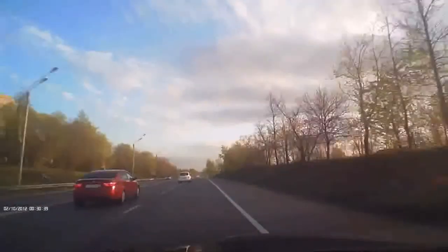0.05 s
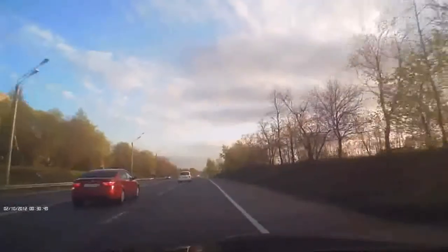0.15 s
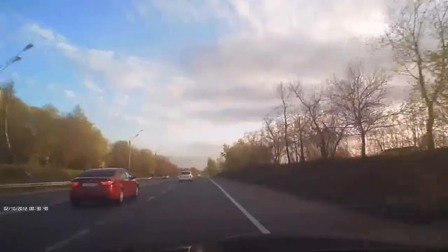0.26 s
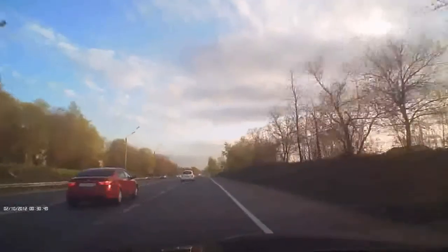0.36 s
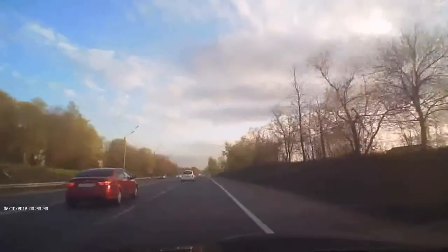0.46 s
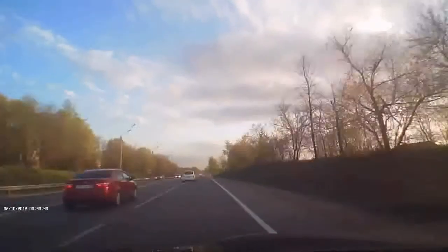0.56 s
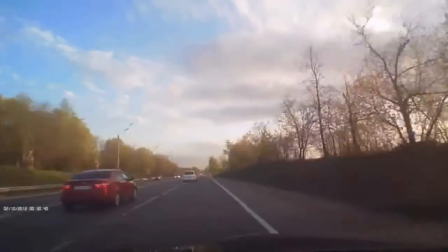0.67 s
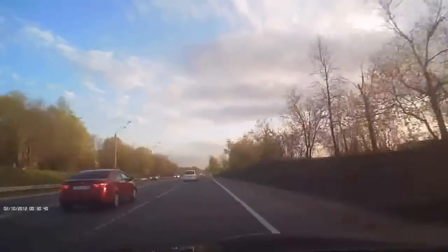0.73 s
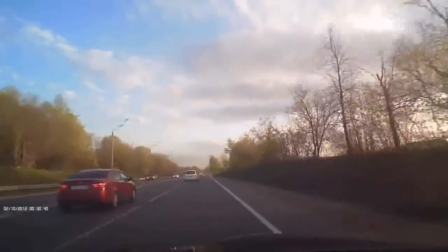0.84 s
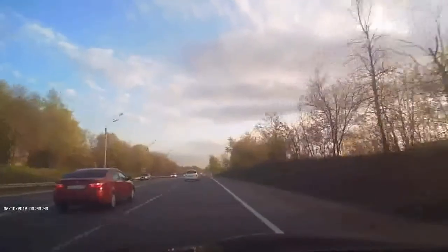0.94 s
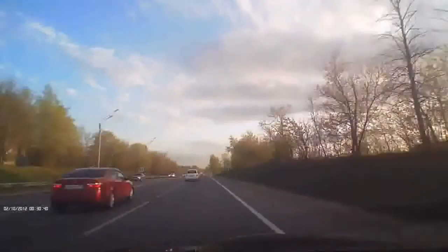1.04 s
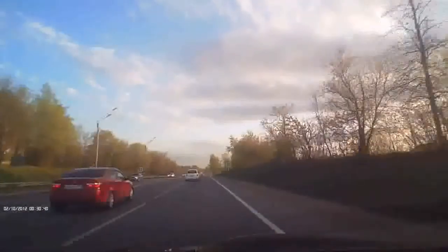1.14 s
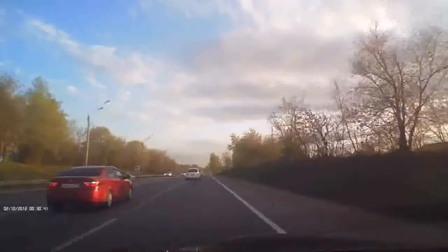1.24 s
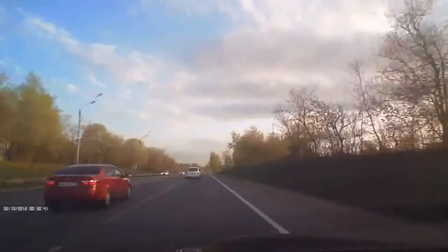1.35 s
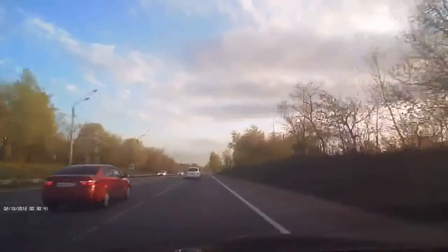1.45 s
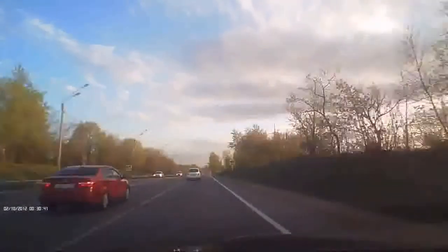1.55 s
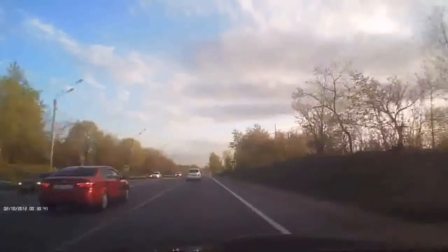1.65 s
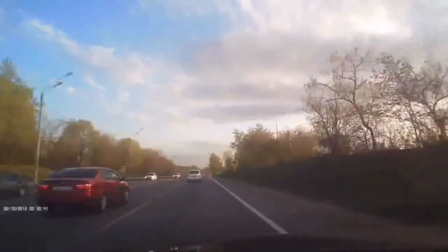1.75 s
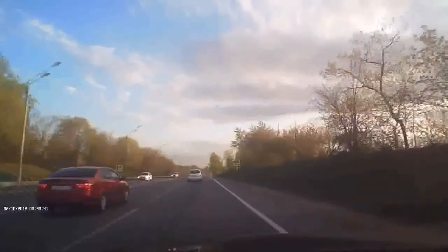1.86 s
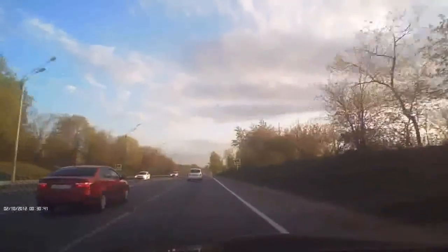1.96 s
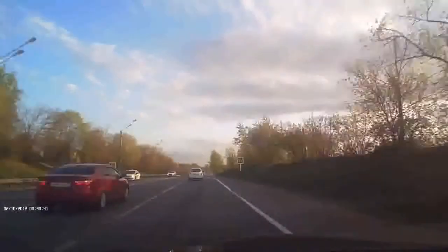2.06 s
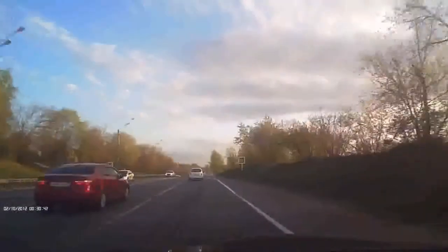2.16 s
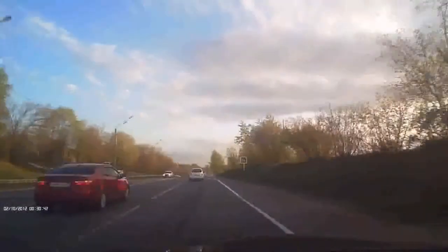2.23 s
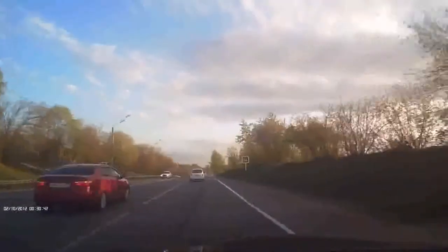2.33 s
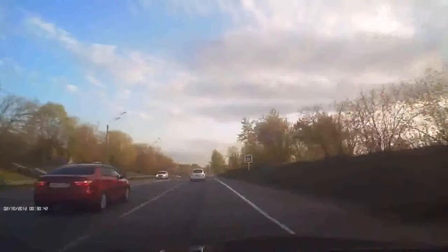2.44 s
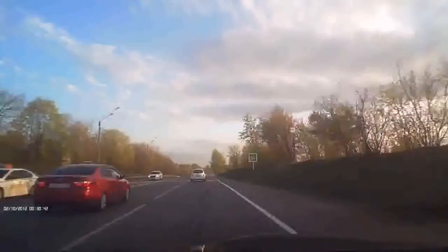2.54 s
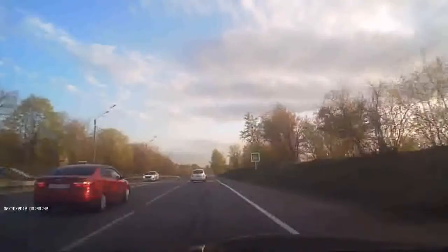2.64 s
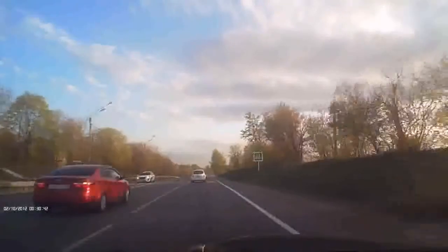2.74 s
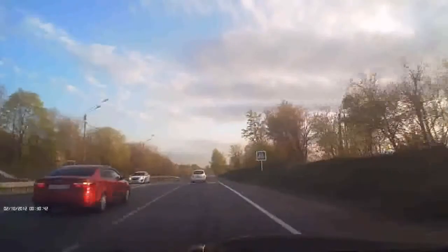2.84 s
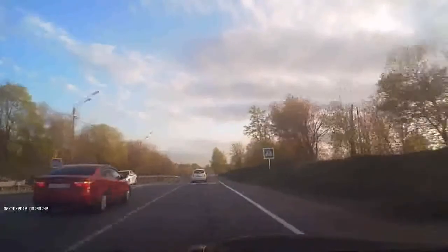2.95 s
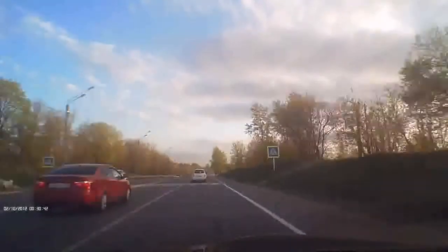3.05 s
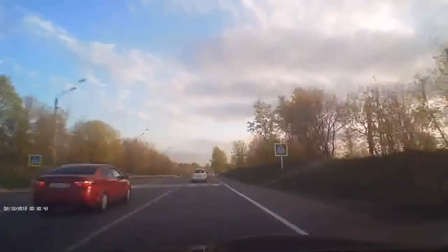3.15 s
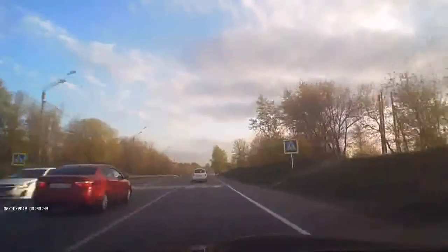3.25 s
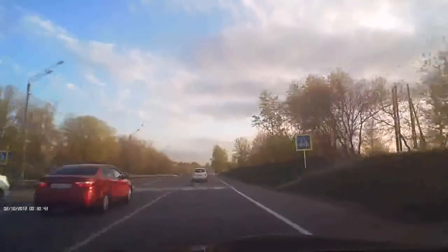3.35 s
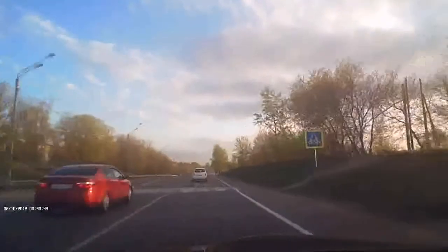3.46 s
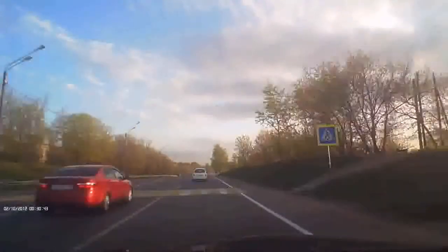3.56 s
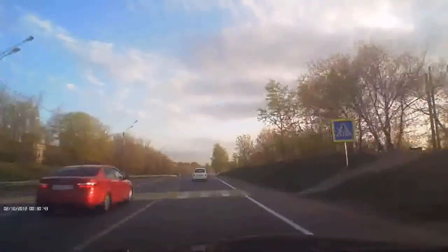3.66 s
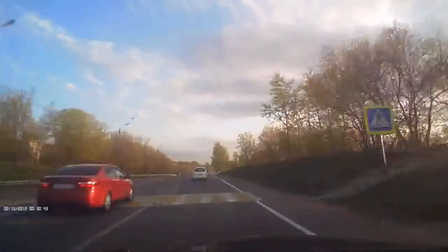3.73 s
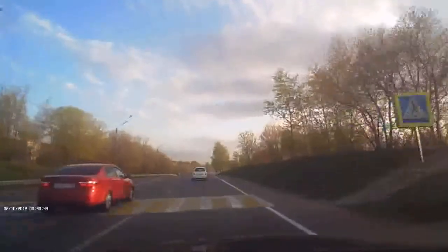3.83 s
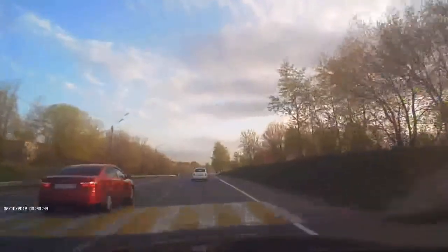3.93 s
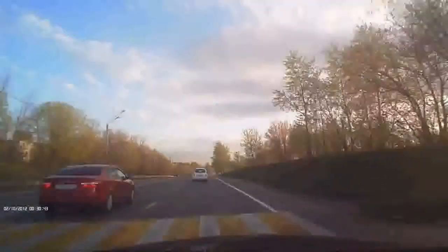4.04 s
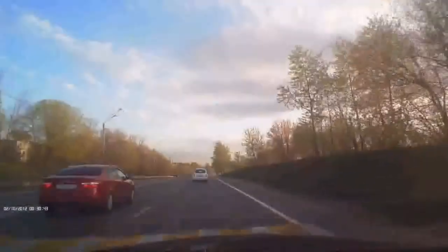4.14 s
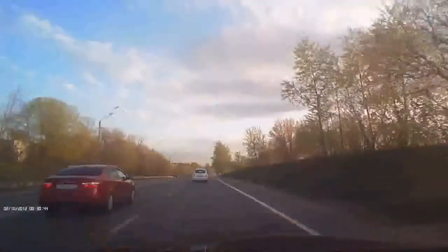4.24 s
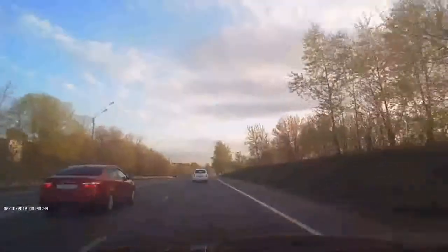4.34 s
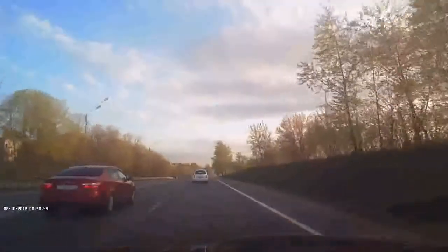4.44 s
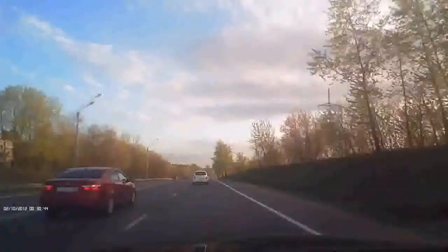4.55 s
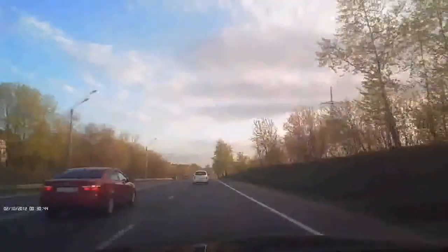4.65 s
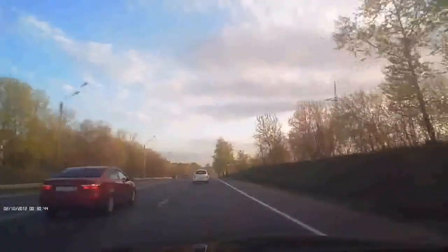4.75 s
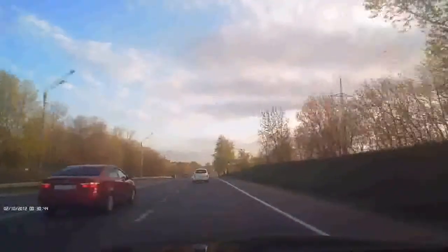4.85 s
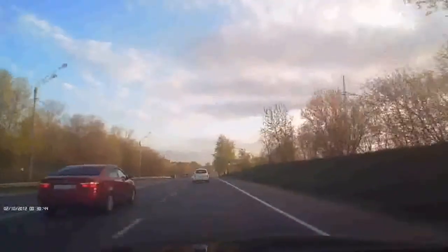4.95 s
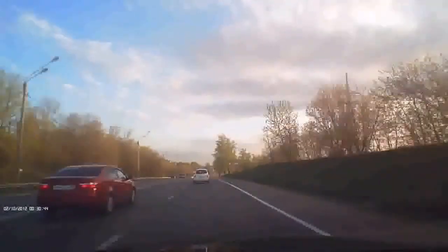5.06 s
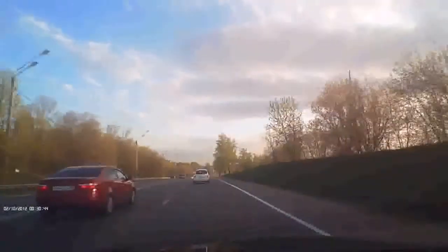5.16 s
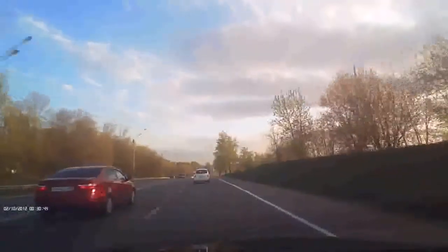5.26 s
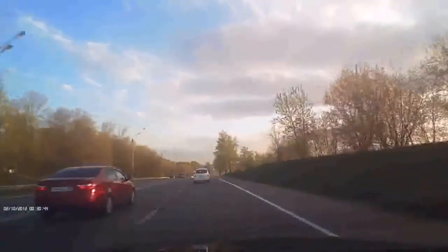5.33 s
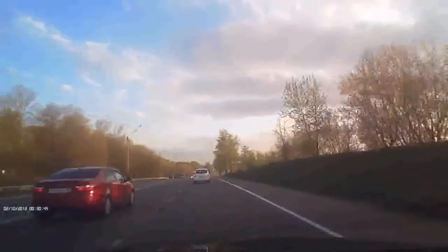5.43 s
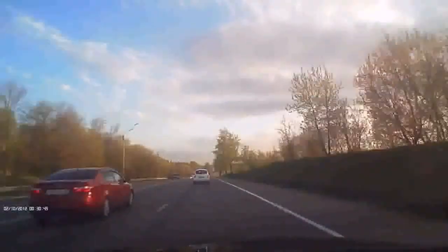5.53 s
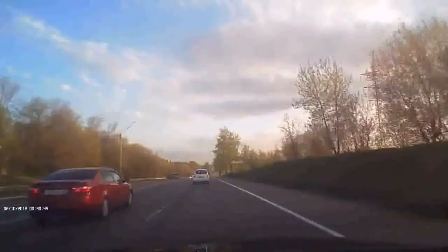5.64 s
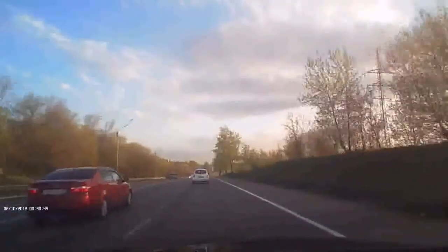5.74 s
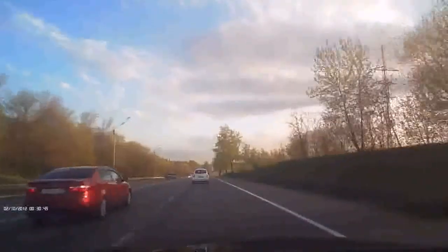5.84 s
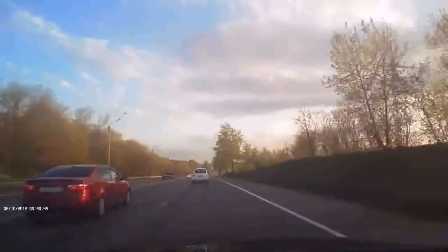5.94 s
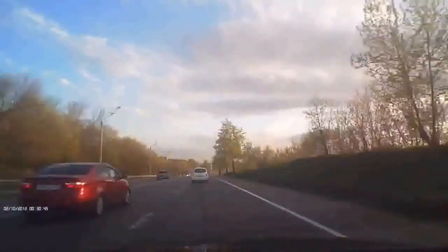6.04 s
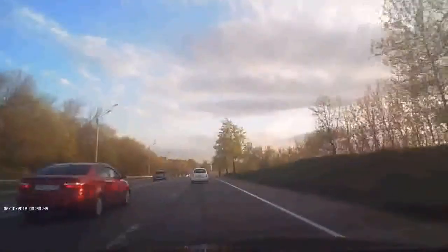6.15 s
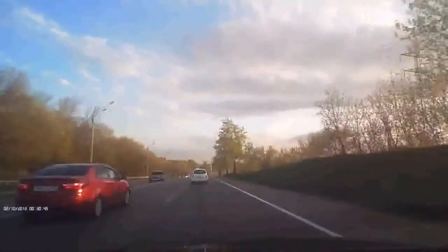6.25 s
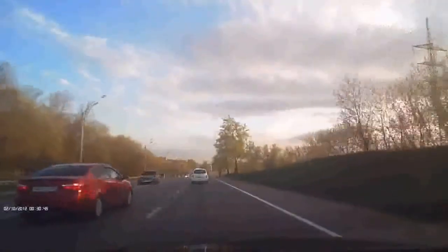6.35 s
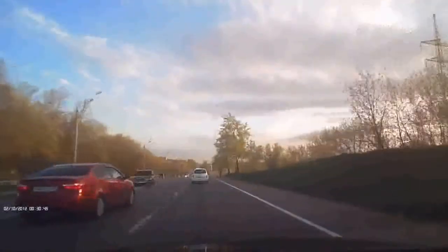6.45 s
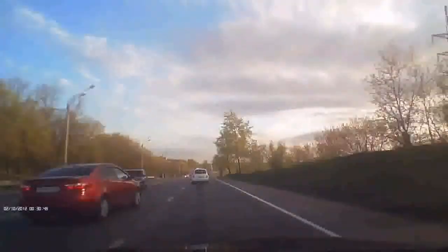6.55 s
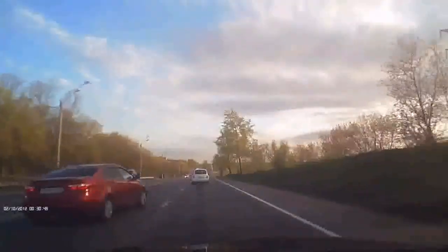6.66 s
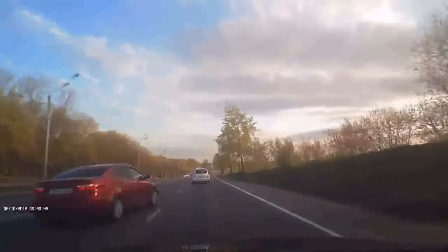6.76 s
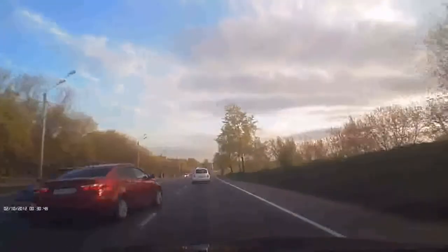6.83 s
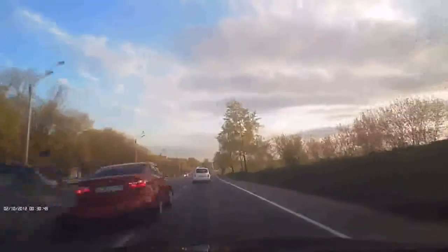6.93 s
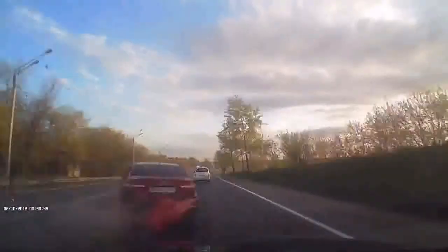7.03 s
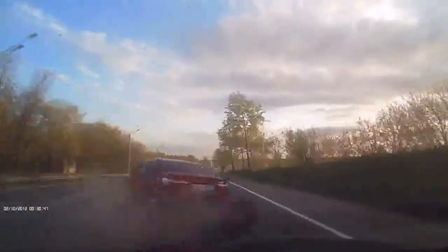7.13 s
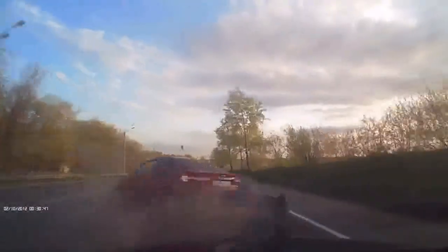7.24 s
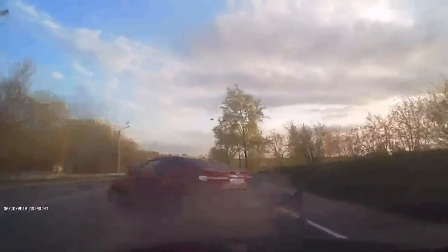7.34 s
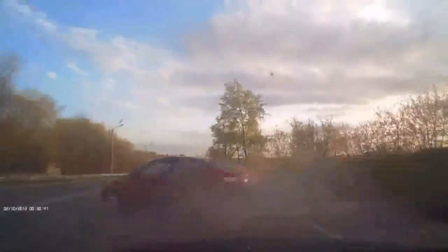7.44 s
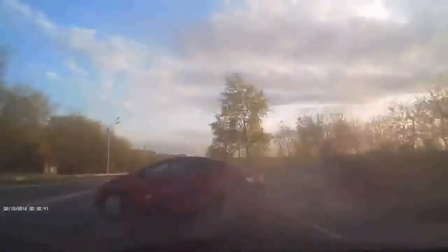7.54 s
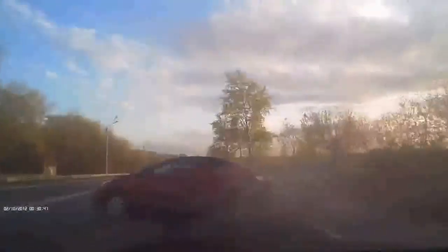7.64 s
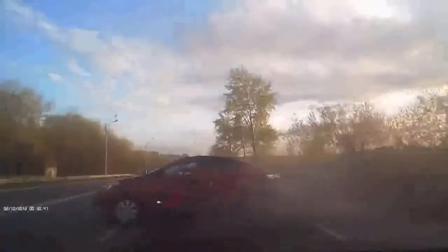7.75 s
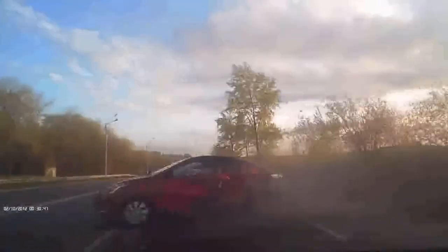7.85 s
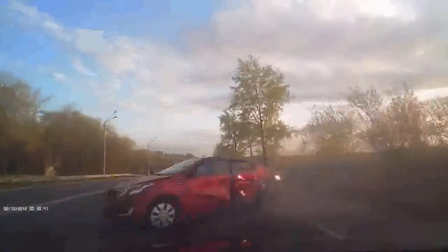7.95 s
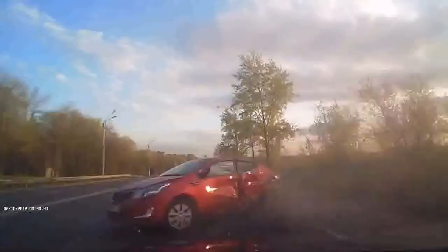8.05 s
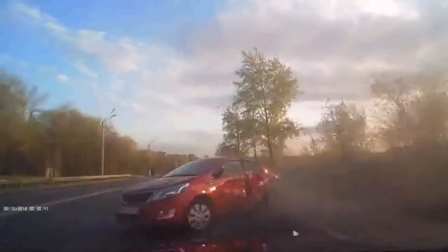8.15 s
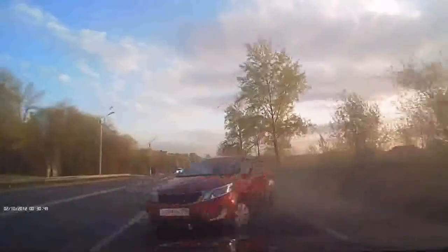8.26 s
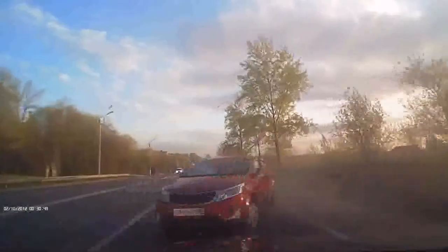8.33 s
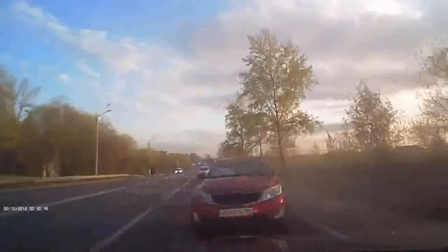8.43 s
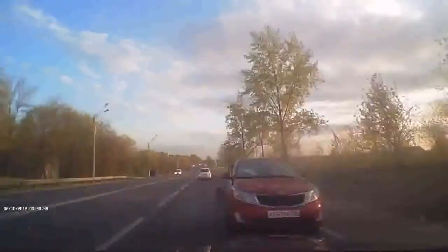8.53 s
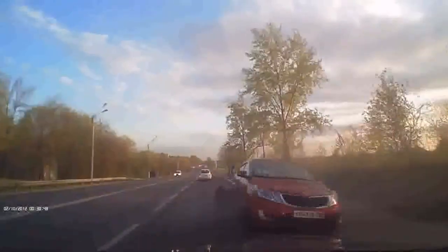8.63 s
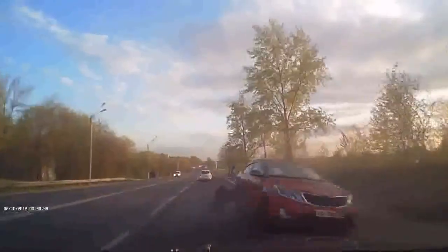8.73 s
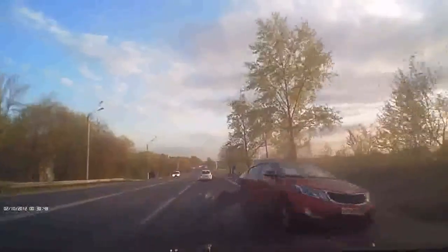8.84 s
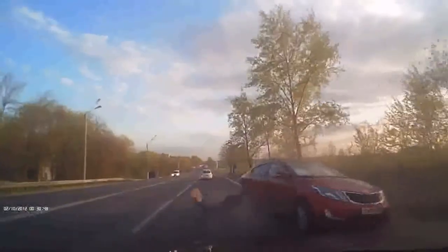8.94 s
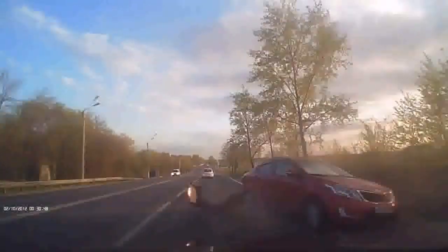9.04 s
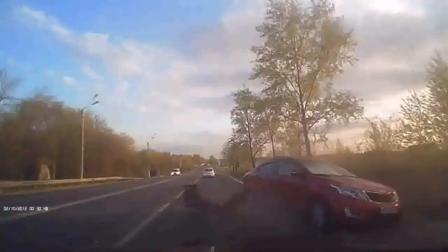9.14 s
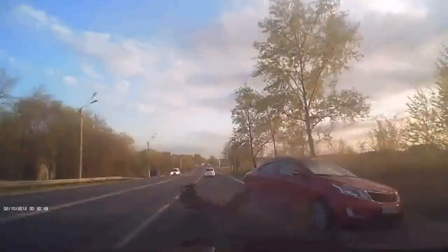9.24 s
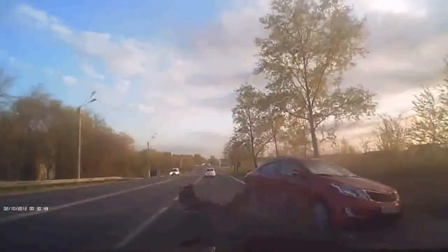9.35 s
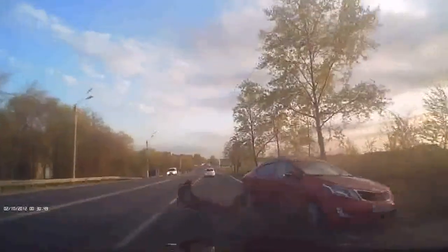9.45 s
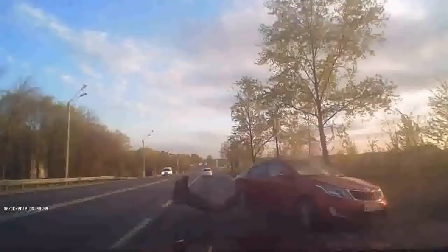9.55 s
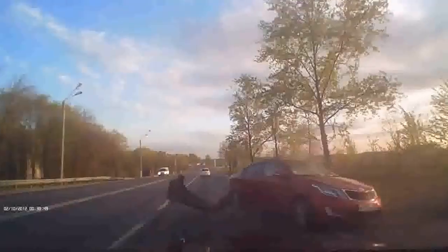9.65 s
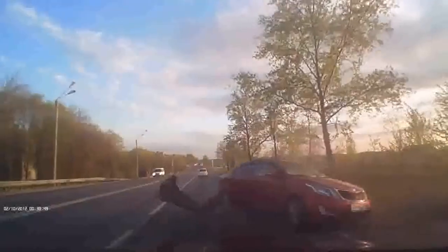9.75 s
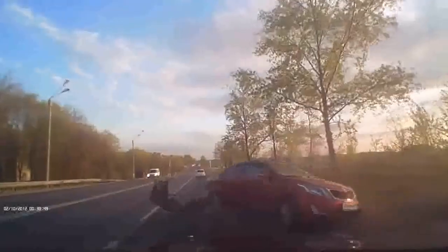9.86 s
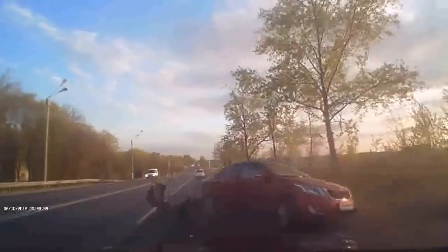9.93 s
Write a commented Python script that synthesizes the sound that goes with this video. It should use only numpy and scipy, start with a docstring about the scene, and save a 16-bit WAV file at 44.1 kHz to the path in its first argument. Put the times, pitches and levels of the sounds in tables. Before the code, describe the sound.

Muffled cabin sound of a car on a fast road: boomy, uneven rolling noise and one tiny dry tick. Then another car crashes close ahead: clustered metallic crunches distort the small microphone, torn metal shrieks, tyres squeal roughly around one tone, and debris ticks and thumps under the wheels. Low braking judder peaks, then everything thins into quieter road noise and faint chattering screeches.

```python
"""A car crash heard inside a following car through a small, overloaded, hissing microphone.
First filtered-noise tyre roar, booming and swelling on rough asphalt, and body heave; one tiny tick.
Near 7 s a string of blows: fracture bursts ring in sheet metal, torn metal shrieks, scraping grinds.
With them tyres squeal in wavering stick-slip tones, fragments tick, wreckage thumps, braking judders.
Last, roar and judder sink and thin screeches trail off."""
import sys
import numpy as np
from scipy import signal
from scipy.fft import rfft, irfft, next_fast_len
from scipy.io import wavfile
from scipy.ndimage import uniform_filter1d

SR = 44100
rng = np.random.default_rng(int(sys.argv[2]) if len(sys.argv) > 2 else 0)


def dump_mix(stems):
    """Bounce the given channels to the path in sys.argv[1] as a 16-bit WAV at rate SR."""
    frames = np.atleast_2d(stems).T  # one column per channel
    limited = np.clip(frames, -1, 1)  # hard clip at full scale
    pcm = np.round(limited * 32767).astype(np.int16)
    wavfile.write(sys.argv[1], SR, pcm)


N = 440559
TIME = np.arange(N) / SR


def amp(db):
    """Decibels to gain."""
    return 10 ** (np.asarray(db) / 20)


def evened(x):
    """Scales to rms 1."""
    return x / np.sqrt(np.mean(x ** 2) + 1e-20)


def level(rows):
    """Gain over time from rows of (s, dB); -120 dB before the first row."""
    time_s, db = np.transpose(rows)
    return amp(np.interp(TIME, time_s, db, left=-120))


def swell(s, half_s):
    """Gaussian rise to 1 and back around time s; 1/e at half_s on either side."""
    return np.exp(-((TIME - s) / half_s) ** 2)


def decay(t, t60):
    """Exponential decay by 60 dB in t60 seconds."""
    return np.exp(-np.log(1000) * t / t60)


def add(mix, s, sound):
    """Mixes a sound in at time s."""
    part = mix[round(s * SR):][:len(sound)]
    part += sound[:len(part)]


def wander(rate_hz, size=N):
    """Smooth random curve of rms 1, moving up to about the given rate."""
    padded = next_fast_len(size)
    hz = np.fft.rfftfreq(padded, 1 / SR)
    spectrum = rfft(rng.standard_normal(padded)) * np.exp(-(hz / rate_hz) ** 2)
    return evened(irfft(spectrum, padded)[:size])


# Air and trim resonances of the cabin. Each row: centre in Hz, width in Hz, lift in dB.
CABIN_HZ_HZ_DB = [(113.2, 20, 4.5), (172.6, 12, 6.5), (213.8, 33, 4.5), (311.6, 36, 3.5), (409, 43, 6.5),
                  (612, 67, 3.5), (768, 87, 7.5), (904.6, 26, 8), (985, 96, 5.5), (1113, 63, 9),
                  (1212, 31, 8.5), (1450, 180, 6), (1440, 170, -0.5), (1591, 17, 9.5), (1870, 80, 6)]


def colour(x, spectrum, cabin=1., size=8192):
    """Minimum-phase filter: a smooth (Hz, dB) spectrum with a share of the cabin's resonances."""
    hz = np.fft.rfftfreq(size, 1 / SR)
    f, db = np.transpose(spectrum)
    lift_db = sum(height * np.exp(-2 * ((hz - centre) / width) ** 2)
                  for centre, width, height in CABIN_HZ_HZ_DB)
    standing_out_db = lift_db - uniform_filter1d(lift_db, size=70)
    gain_db = np.interp(np.log(hz + 1), np.log(f), db) + cabin * standing_out_db
    log_gain = np.log(amp(np.r_[gain_db, gain_db[-2:0:-1]]))
    response = np.fft.ifft(np.exp(np.conj(signal.hilbert(log_gain)))).real[:size // 2]
    fade_out = signal.windows.tukey(size, .5)[size // 2:]
    return signal.oaconvolve(x, response * fade_out)[:len(x)]


def resonate(x, hz, width_hz):
    """A resonance of gain 1 that follows the curve hz."""
    turn = np.exp(2j * np.pi * np.cumsum(hz * np.ones(len(x))) / SR)
    r = np.exp(-np.pi * width_hz / SR)
    return 2 * (turn * signal.lfilter([1 - r], [1, -r], x / turn)).real


def resonant_noise(hz, width_hz, size=N):
    """Noise through two equal resonances, rms 1."""
    once = resonate(rng.standard_normal(size), hz, width_hz)
    return evened(resonate(once, hz, width_hz))


def snaps(per_s, spread_db):
    """A random train of small and large fractures, rms 1."""
    size = amp(spread_db * np.minimum(rng.exponential(1, N), 4))
    return evened(size * rng.choice([-1, 1], N) * (rng.random(N) < per_s / SR))


# Tyre roar on asphalt. Each row: frequency in Hz, density in dB per Hz.
ROAR_HZ_DB = [(25, -12.5), (50, 1), (80, 1.5), (140, -2), (350, -3), (430, -5.5), (520, -4.5), (700, -7.5),
              (900, -3.5), (1120, -3.5), (1500, -9), (1800, -20), (2400, -26.5), (5000, -79)]
# Hiss of the tread. Each row: frequency in Hz, density in dB per Hz.
TREAD_HZ_DB = [(400, -39.5), (1200, -6), (1650, 1), (2000, -3.5), (2500, -17.5), (3150, -24.5), (4000, -31),
               (5000, -41.5), (7000, -58)]
# Rolling level, following the car's speed. Each row: time in seconds, reference level in dB.
ROLLING_S_DB = [(0.0, -29), (4.2, -29), (7.0, -30), (9.4, -32.5), (9.99, -34.5)]
# Coarse asphalt. Each row: centre in seconds, half length in seconds, lift of roar and hiss in dB,
# further lift of hiss in dB.
COARSE_PATCHES = [(0.803, 0.17, 2.1, 0.5), (2.49, 0.1, 3, 1.7), (3.246, .3, 1.5, 2.5), (3.927, .2, 1, 4.5)]
# Rough patches and debris under the wheels. Each row: centre in seconds, level in dB,
# resonance in Hz, half length in seconds.
BOOMS = [(.85, -35.5, 214, 0.094), (2.497, -29.5, 110.5, 0.027), (4.107, -34.5, 98, 0.44),
         (5.357, -28, 176, 0.11), (5.95, -30.5, 402.6, 0.17), (8.033, -26, 314, .05),
         (8.355, -23, 300, .022), (8.551, -25.5, 140, .04)]
ROAR_DB, TREAD_DB = 5.0, -12.5  # over the rolling level on smooth asphalt


def road():
    """Noise of tyre on asphalt swells with its grain; rough patches stir low cabin resonances."""
    patch_db = sum(db * swell(s, half) for s, half, db, _ in COARSE_PATCHES)
    hiss_db = sum(db * swell(s, half) for s, half, _, db in COARSE_PATCHES)
    roar = evened(colour(rng.standard_normal(N), ROAR_HZ_DB, cabin=0.95))
    roar *= amp(ROAR_DB + 0.73 * wander(22.0))
    tread = evened(colour(rng.standard_normal(N), TREAD_HZ_DB, cabin=0.63))
    tread *= amp(TREAD_DB + hiss_db + 0.73 * wander(14.))
    rolling = (roar + tread) * level(ROLLING_S_DB) * amp(patch_db + 0.41 * wander(4.))
    booms = sum(resonant_noise(hz, 36.) * amp(db) * swell(s, half) for s, db, hz, half in BOOMS)
    return rolling + booms


# Heave of the body on its springs. Each row: frequency in Hz, density in dB per Hz.
HEAVE_HZ_DB = [(4, -1), (12, -4), (18, 18), (28, -4.5), (40, -3), (55, -13), (100, -21), (500, -100)]
# Dips in the road. Each row: centre in seconds, lift of the heave in dB.
DIPS_S_DB = [(.04, 6.5), (.44, 6), (.97, 4), (2.22, 4.5), (3.42, 4.5), (4.23, 3.5), (4.58, 9.5), (4.9, 6),
             (6.88, 2.5), (7.23, 4), (7.85, 7), (8.72, 4), (9.6, 5)]
# Floor judder. Each row: frequency in Hz, density in dB per Hz.
JUDDER_HZ_DB = [(20, -13), (33, 8), (48, 0), (75, 3.5), (130, 0), (180, -5.5), (230, -7), (310, -2.5),
                (450, -16.5), (900, -53.5), (3000, -92.5)]
# Braking effort. Each row: time in seconds, judder in dB before JUDDER_TRIM_DB.
BRAKING_S_DB = [(7.2, -34.5), (7.75, -22.5), (7.96, -15), (8.35, -18.5), (8.7, -26), (9.4, -39),
                (9.99, -47)]
HEAVE_DB, DIP_HALF_S = 6.0, 0.07  # heave over the rolling level
JUDDER_TRIM_DB = -4.5
JOLT_S, JOLT_DB, JOLT_HALF_S = 7.09, -16.0, 0.039  # first impact shakes the floor


def body():
    """The sprung body heaves at dips, jolts at the impact and judders in braking, low-passed."""
    rocking_db = HEAVE_DB + sum(db * swell(s, DIP_HALF_S) for s, db in DIPS_S_DB)
    heave = evened(colour(rng.standard_normal(N), HEAVE_HZ_DB, cabin=0))
    heave *= level(ROLLING_S_DB) * amp(rocking_db)
    braking = level(BRAKING_S_DB) * amp(JUDDER_TRIM_DB)
    jolt = amp(JOLT_DB) * swell(JOLT_S, JOLT_HALF_S)
    judder = evened(colour(rng.standard_normal(N), JUDDER_HZ_DB, cabin=0.25))
    judder *= (braking + jolt) * amp(1.4 * wander(30.))
    return signal.sosfilt(signal.butter(2, 800, fs=SR, output="sos"), heave + judder)


TICK_S, TICK_DB = 2.5284, -24.5


def tick():
    """One tiny dry tick: a four-sample pulse."""
    out = np.zeros(N)
    add(out, TICK_S, amp(TICK_DB) * np.array([0.7, 0.62, -0.2, -.6]))
    return out


# Fragments striking car and road. Each row: start in seconds, level in dB, ring in Hz,
# ring width in Hz, t60 in seconds.
FRAGMENTS = [(7.221, -16.5, 4560, 131, 0.034), (7.432, -31, 4000, 5000, 0.026),
             (7.568, -31, 4000, 5500, 0.012), (7.582, -41, 4500, 4500, 0.023),
             (7.63, -42, 4500, 4500, 0.017), (7.743, -32, 3970, 5500, 0.011),
             (7.922, -40, 5430, 4500, 0.056), (7.997, -42, 3960, 4500, 0.011),
             (8.161, -40.5, 5340, 2820, 0.013), (8.438, -42, 5900, 250, 0.035),
             (8.475, -41, 3010, 3000, 0.12), (8.86, -56.5, 7000, 1800, 0.058),
             (9.224, -48, 3550, 2500, 0.087)]
# Wreckage under the wheels. Each row: start in seconds, peak in dB, t60 in seconds.
THUMPS = [(7.586, -9, 0.047), (7.945, -9.5, 0.16), (8.62, -14.5, 0.072), (8.837, -11, 0.075)]


def wreckage():
    """Glass and plastic tick and ring as decaying tones; larger pieces thump as decaying noise."""
    out, t = np.zeros(N), np.arange(SR // 4) / SR
    for s, db, hz, width, t60 in FRAGMENTS:
        pitch_hz = hz + width / 2 * wander(width, len(t))  # narrow: a ping; wide: a tick
        ring = np.sin(2 * np.pi * np.cumsum(pitch_hz) / SR)
        attack = 1 - np.exp(-t * width * 2)
        add(out, s, ring * amp(db) * decay(t, t60) * attack)
    floor_hz_db = [(50, -1.5), (170, 3.0), (350, -6.5), (750, -2),
                   (1500, -19), (5000, -52.0), (10000, -74.5)]
    for s, db, t60 in THUMPS:
        push = rng.standard_normal(len(t)) * decay(t, t60)
        knock = colour(push, floor_hz_db, cabin=.3)
        add(out, s, amp(db) * knock / abs(knock).max())
    return out


def squeal(rows, jitter, width_hz, throb_db, throb_hz, bend=0.031):
    """Tread or torn metal sticks and slips at a wavering pitch; roughness turns tone to chatter."""
    s, *columns = np.transpose(rows)
    t = np.arange(s[0], s[-1], 1 / SR)
    hz, db, octave_db, rough = (np.interp(t, s, c) for c in columns)
    rough, size = np.clip(rough, 0, 1), len(t)
    # uneven hops of the contact swell the sound and bend its pitch
    hop_hz = throb_hz * (1 + .4 * wander(35.16, size))
    hop = np.sqrt(rough) * np.sin(2 * np.pi * np.cumsum(hop_hz) / SR)
    pitch_hz = hz * (1 + jitter * wander(115.5, size) + bend * hop)
    phase = 2 * np.pi * np.cumsum(pitch_hz) / SR
    tone = np.zeros(size)
    for k, gain in ((1, 1), (2, amp(octave_db))):
        chatter = resonant_noise(k * hz, width_hz * np.sqrt(k), size)
        pure = np.sqrt(2 * (1 - rough)) * np.cos(k * phase)
        tone += gain * (pure + np.sqrt(rough) * chatter)
    throbbing = evened(tone * amp(throb_db * hop))
    out = np.zeros(N)
    add(out, s[0], amp(db) * throbbing * signal.windows.tukey(size, .02))
    return out


SQUEAL_ATTACK_S, SQUEAL_RELEASE_S = 0.015, .025  # each at most half the slip
SQUEAL_SAG_DB, EDGE_DROP_DB = 1.5, 15


def slip(start, length, db, first_hz, last_hz, octave_db, rough):
    """One slip catches, sags gliding and lets go: rows of s, Hz, dB, octave dB, roughness."""
    attack_end = min(SQUEAL_ATTACK_S, length / 2)
    release_start = max(length - SQUEAL_RELEASE_S, length / 2)
    t = np.array([0, attack_end, release_start, length])
    drop_db = [EDGE_DROP_DB, 0, SQUEAL_SAG_DB, SQUEAL_SAG_DB + EDGE_DROP_DB]
    return [(start + s, first_hz + (last_hz - first_hz) * s / length, db - d, octave_db, rough)
            for s, d in zip(t, drop_db)]


# Tyre squeals. Each row: start in seconds, length in seconds, level in dB, first pitch in Hz,
# last pitch in Hz, octave in dB relative, roughness from 0 to 1.
SQUEALS = [(7.19, 0.32, -19, 927, 943, -12, 0.77), (7.3, .62, -25.5, 1147, 1135, -19, .75),
           (7.482, 0.058, -11.5, 976, 1007, -10.5, 0), (7.532, .07, -11.5, 1012, 1036, -14, .3),
           (7.615, 0.086, -10, 992, 978, -14.5, 0.11), (7.688, 0.076, -14.5, 975, 960, -5.5, 0.4),
           (7.738, 0.061, -12.5, 960, 946, -13, 0.5), (7.79, 0.21, -22.5, 915, 917, -16, .5),
           (7.961, 0.67, -23.5, 1097, 1077, -19.5, 0.51), (7.976, .23, -11.5, 948.7, 911, -16.5, .1),
           (8.19, .385, -18.5, 900, 933, -13, 0.4), (8.485, 0.078, -17.5, 1000, 1115, -16, .35),
           (8.56, .11, -24, 1160, 1290, -27, 0.37), (8.774, .06, -26.5, 1303, 1310, -21, 0.55),
           (9.02, .31, -30, 1053, 1064, -11, 0.74), (9.131, .15, -26, 1254, 1223, -27, 0.3),
           (9.35, 0.076, -26.5, 1165, 1163, -20, 0.55), (9.339, .32, -29, 1008, 1000, -9, 0.72),
           (9.64, .29, -30, 1048, 1058, -12, 0.7)]
# Tyre hop, slowing as the cars lose speed. Each row: time in seconds, mean hops per second.
HOPPING_S_HZ = [(8.4, 46), (9.3, 15)]


def tyres():
    """Sliding tyres bite and let go in stick-slip, each time on their own pitch."""
    out = np.zeros(N)
    for row in SQUEALS:
        hop_hz = np.interp(row[0], *np.transpose(HOPPING_S_HZ))
        out += squeal(slip(*row), jitter=0.0282, width_hz=140,
                      throb_db=5.0, throb_hz=hop_hz, bend=0.034)
    return out


def panels(x, share, t60, count=220):
    """Bent sheet metal rings in many close decaying modes."""
    t = np.arange(SR // 4) / SR
    hz = np.geomspace(1300, 9000, count) * rng.uniform(0.89, 1.01, count)
    phase = rng.uniform(0, 2 * np.pi, count)
    waves = np.sin(2 * np.pi * hz[:, None] * t + phase[:, None])
    modes = np.sqrt(hz) @ waves * decay(t, t60)
    return x + share * signal.oaconvolve(x, modes / np.linalg.norm(modes))[:N]


# The wreck drags on the road. Each row: time of full contact in seconds, level in dB,
# hold in seconds, fade in dB per second.
SCRAPES = [(7.207, -18.5, 0.27, 15), (7.919, -21.5, 0.086, 18), (8.48, -25.5, .005, 120),
           (8.8, -33.5, .01, 60), (9.357, -35, 0.027, 14)]
SCRAPE_RISE_S = 0.03


def dragging():
    """Pressure of the wreck on the road: each contact digs in, holds and fades."""
    contacts = []
    for s, db, hold, fade in SCRAPES:
        fading = amp(db - fade * np.maximum(TIME - s - hold, 0))
        contacts.append(fading * np.where(TIME < s, swell(s, SCRAPE_RISE_S), 1))
    return np.max(contacts, axis=0)


# Crumpling bodywork. Each row: frequency in Hz, density in dB per Hz.
CRUMPLE_HZ_DB = [(59, -58), (100, -0.5), (224, -7.5), (286, -2.5), (329, -11.5), (420, -5), (568, -4),
                 (886, -0.5), (1200, -1), (1910, -11), (2070, -10.5), (4460, -31.5), (12500, -55.5),
                 (16200, -88), (22000, -120)]
# Blows. Each row: peak time in seconds, level in dB, rise in seconds, fall in seconds.
BLOWS = [(7.023, -25, .01, 0.063), (7.059, -19, .002, 0.017), (7.073, -5, 0.024, 0.048),
         (7.102, -7.5, 0.016, 0.044), (7.148, -19, .005, .02), (7.228, -16.5, 0.033, 0.033),
         (7.28, -9.5, 0.024, 0.052), (7.318, -7, 0.013, 0.028), (7.378, -13.5, .012, 0.041),
         (7.435, -18, .005, 0.058), (7.583, -11, 0.0073, 0.013), (7.923, -20, 0.006, 0.028)]
# Scraping, dulled by closed windows. Each row: frequency in Hz, density in dB per Hz.
GRIND_HZ_DB = [(60, -16), (200, -7), (450, -5.5), (650, -2), (1000, 4.5), (1450, 3), (2000, -5),
               (2700, -14.5), (4000, -27.5), (6000, -46.5), (8000, -49), (12500, -72)]
# Shrieks of tearing metal. Each row: start in seconds, level in dB, pitch in Hz.
SHRIEKS = [(7.125, -20, 1478), (7.205, -21, 1900), (7.245, -16, 1870), (7.295, -20, 1670),
           (7.358, -13.5, 1622), (7.42, -15.5, 1585)]
SHRIEK_S, SHRIEK_SAG = .048, 0.017  # length; share by which the pitch sinks


def collision():
    """Blows drive fracture bursts through panels; metal shrieks tearing, the wreck grinds along."""
    power = np.zeros(N)
    for s, db, rise, fall in BLOWS:
        course = np.where(TIME < s, ((TIME - s) / rise) ** 2, (TIME - s) / fall)
        power += amp(db) ** 2 * np.exp(-2 * course)
    crush = evened(colour(snaps(per_s=4000, spread_db=2.5), CRUMPLE_HZ_DB, cabin=0.78))
    crush *= np.sqrt(power)
    grind = evened(colour(snaps(per_s=2400, spread_db=2.5), GRIND_HZ_DB, cabin=.7))
    grind *= dragging() * amp(2.0 * wander(35.))  # catches and slips
    shriek = np.zeros(N)
    for s, db, hz in SHRIEKS:
        rows = slip(s, SHRIEK_S, db, hz, hz * (1 - SHRIEK_SAG), octave_db=-21., rough=0.36)
        shriek += squeal(rows, jitter=0.023, width_hz=160, throb_db=4.0, throb_hz=61.4)
    return panels(crush + grind, share=0.24, t60=0.054) + shriek


def scene():
    """Sum of all sources, one channel."""
    return (road() + body() + tick() + wreckage() + tyres() + collision())[None]


# Microphone hiss. Each row: frequency in Hz, density in dB per Hz.
HISS_HZ_DB = [(100, 2), (4000, -4), (7000, -6.5), (12500, -7.5)]
EDGE_HZ = 12750


def record(dry, ceiling=0.76, knee=12.0, hiss_db=-66.0):
    """The microphone hisses and flattens peaks; its coupling tilts flat tops; then the band limit."""
    x = dry + amp(hiss_db) * evened(colour(rng.standard_normal(N), HISS_HZ_DB, cabin=0))
    x = x / (1 + abs(x / ceiling) ** knee) ** (1 / knee)
    x = signal.lfilter(*signal.butter(1, 12, "high", fs=SR), x)
    band_limit = signal.firwin(511, EDGE_HZ, window=("kaiser", 9), fs=SR)
    return signal.oaconvolve(x, band_limit[None], "same")


dry = scene()
out = record(dry)
dump_mix(out)
```